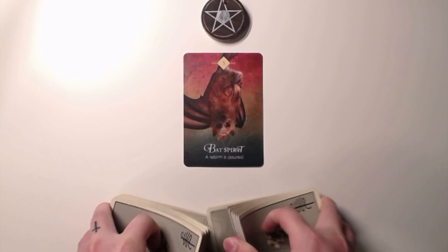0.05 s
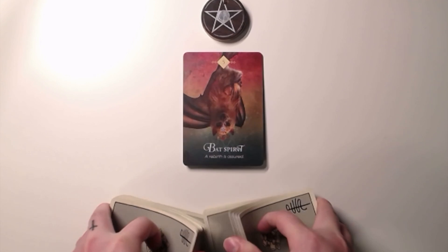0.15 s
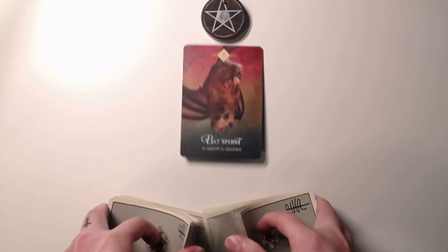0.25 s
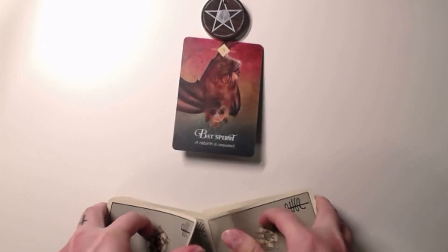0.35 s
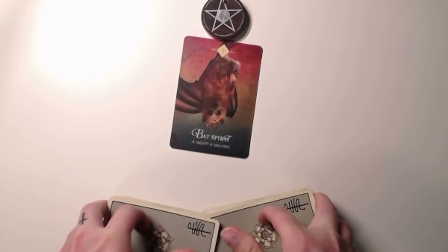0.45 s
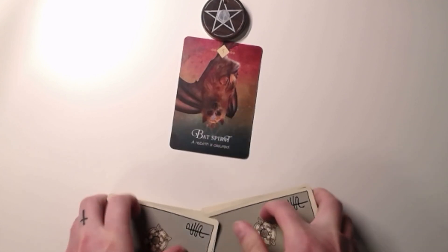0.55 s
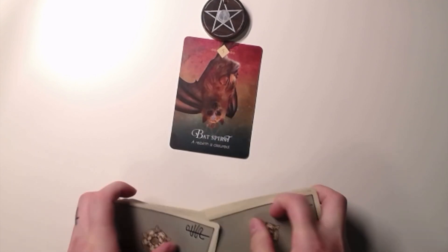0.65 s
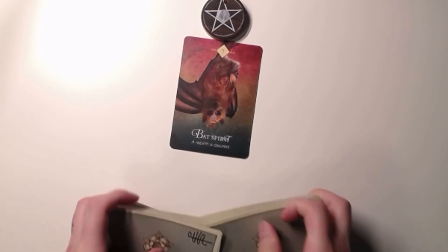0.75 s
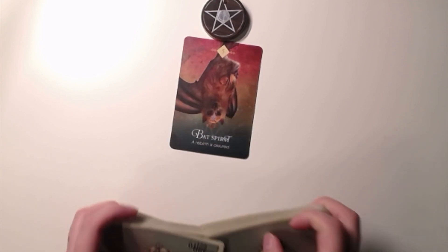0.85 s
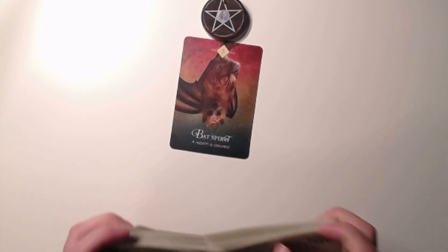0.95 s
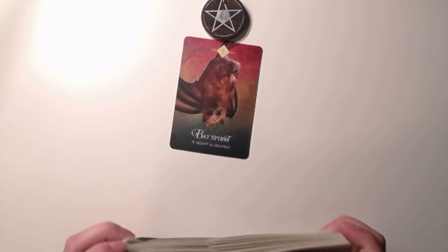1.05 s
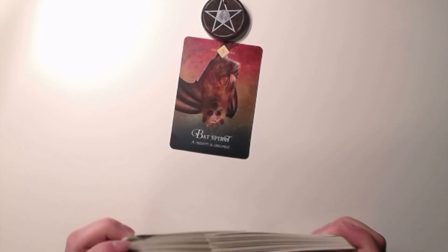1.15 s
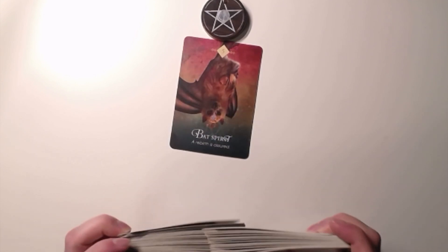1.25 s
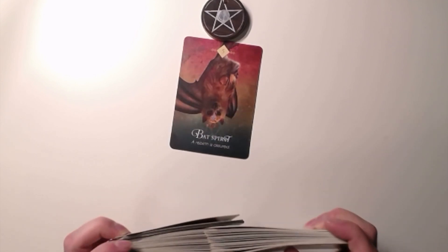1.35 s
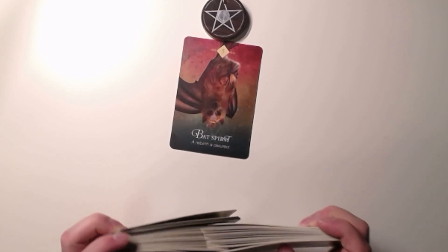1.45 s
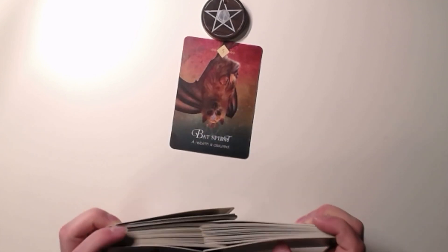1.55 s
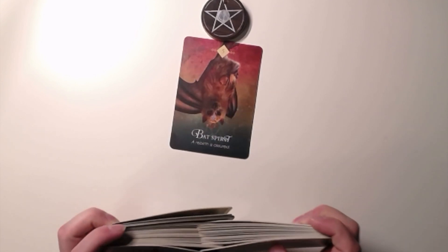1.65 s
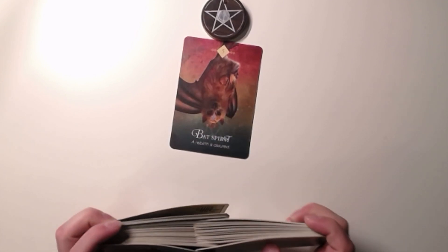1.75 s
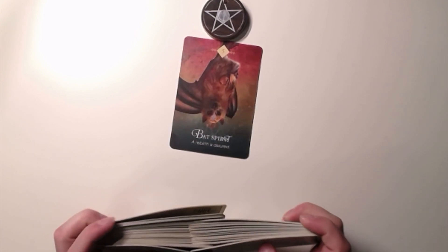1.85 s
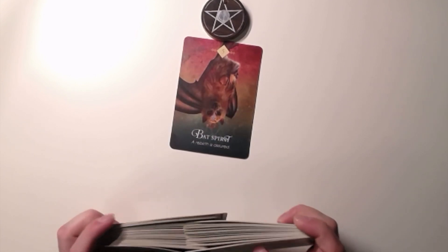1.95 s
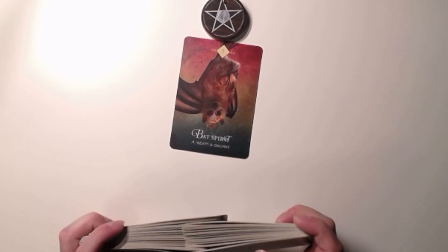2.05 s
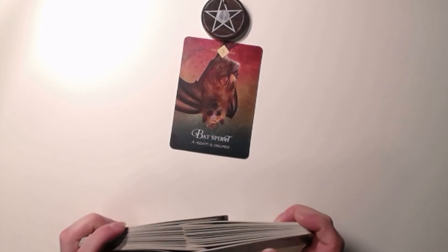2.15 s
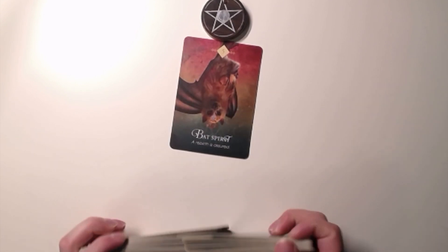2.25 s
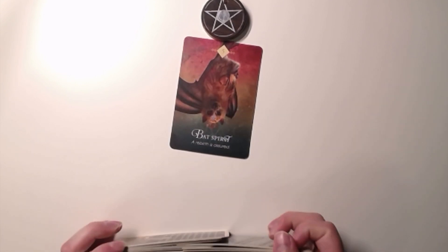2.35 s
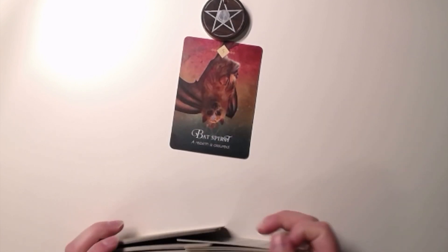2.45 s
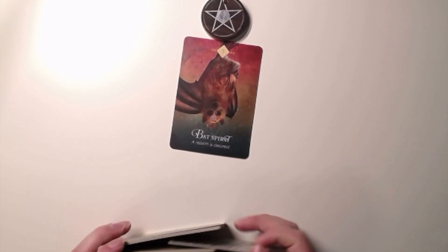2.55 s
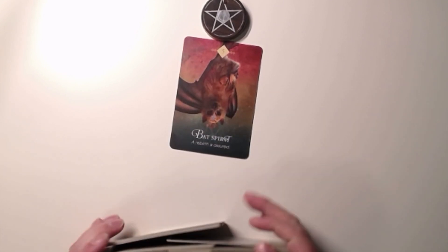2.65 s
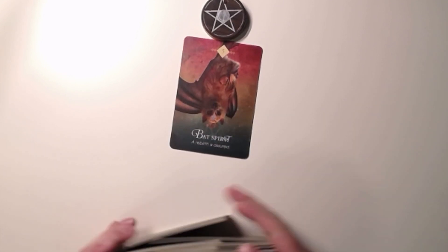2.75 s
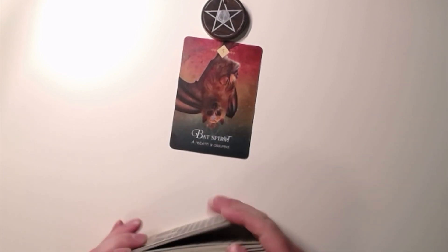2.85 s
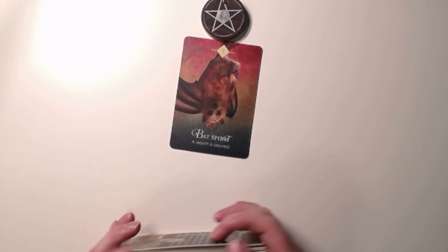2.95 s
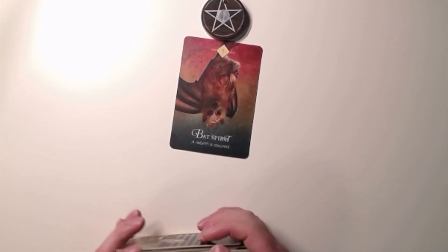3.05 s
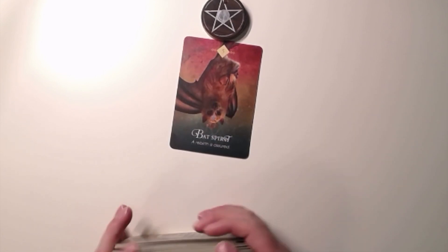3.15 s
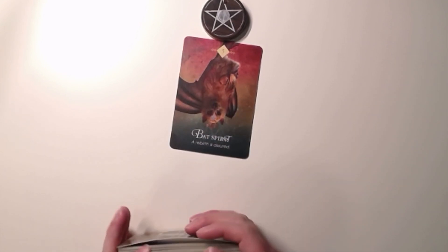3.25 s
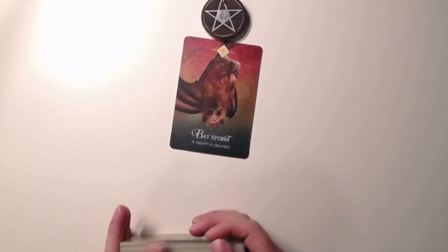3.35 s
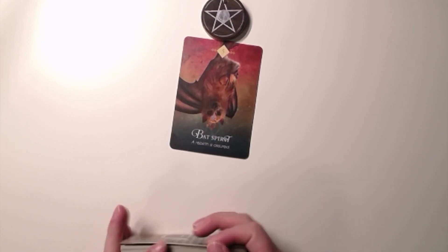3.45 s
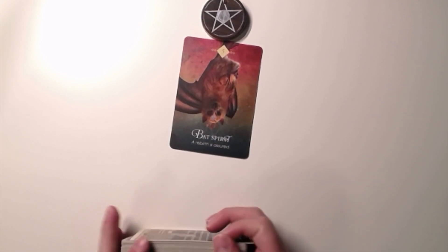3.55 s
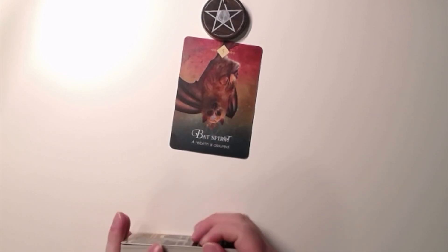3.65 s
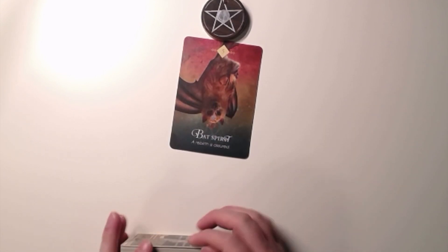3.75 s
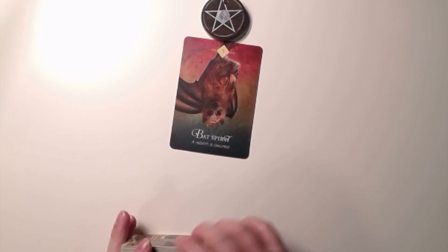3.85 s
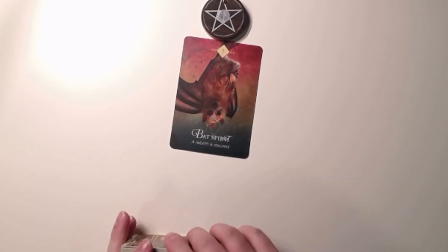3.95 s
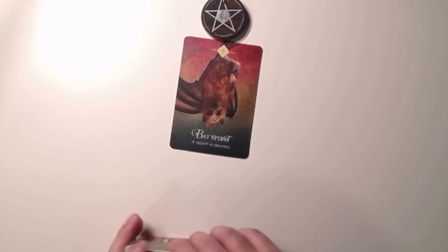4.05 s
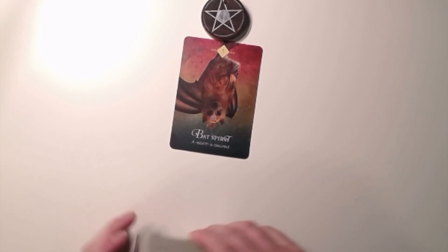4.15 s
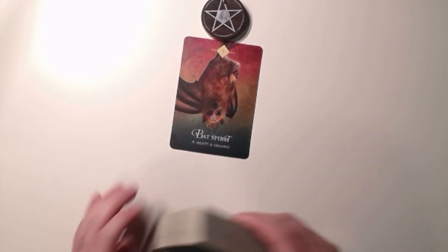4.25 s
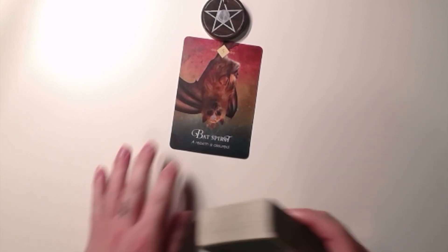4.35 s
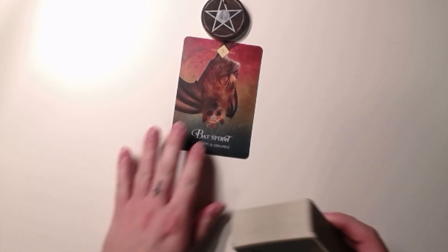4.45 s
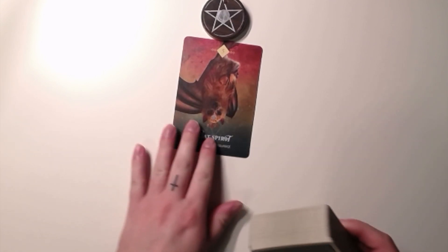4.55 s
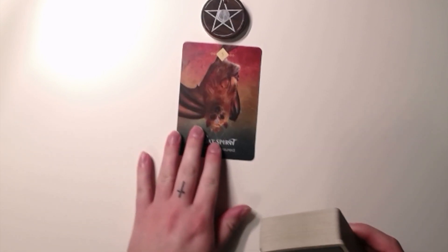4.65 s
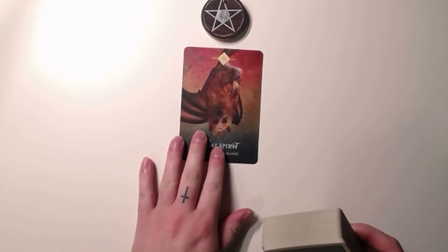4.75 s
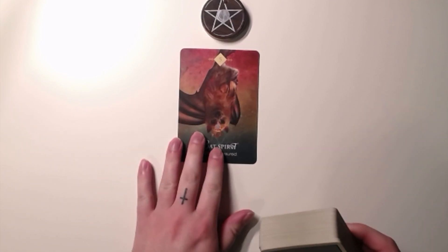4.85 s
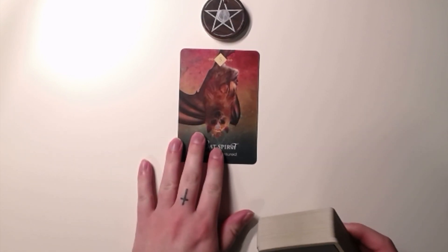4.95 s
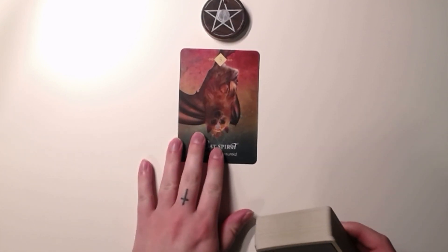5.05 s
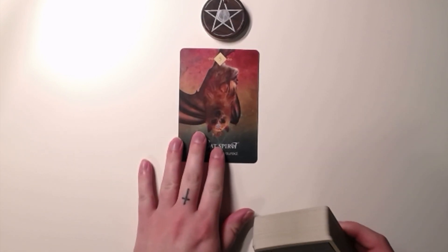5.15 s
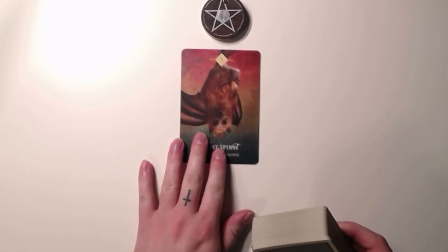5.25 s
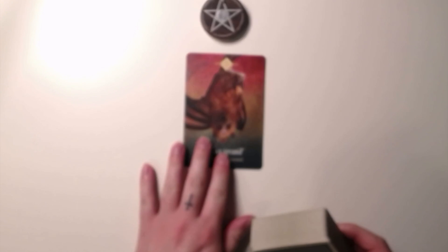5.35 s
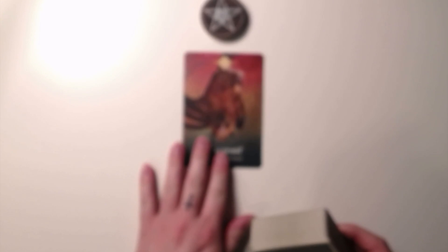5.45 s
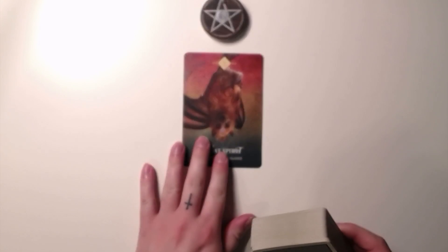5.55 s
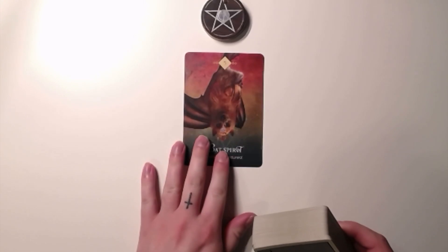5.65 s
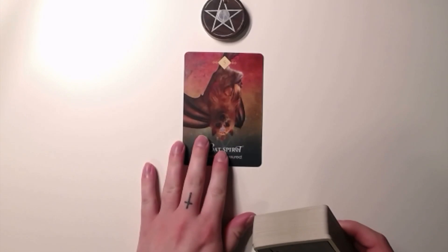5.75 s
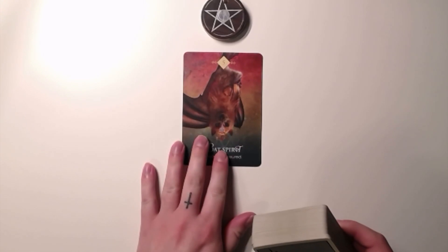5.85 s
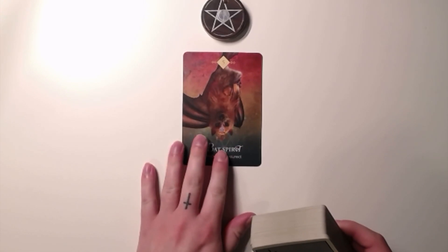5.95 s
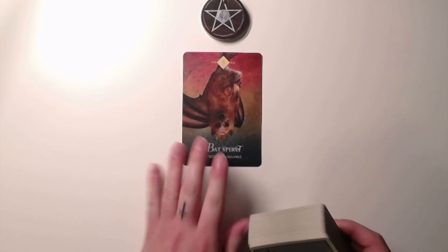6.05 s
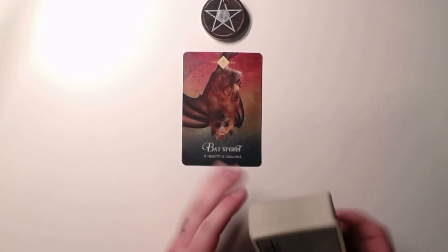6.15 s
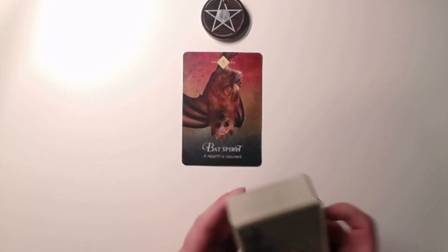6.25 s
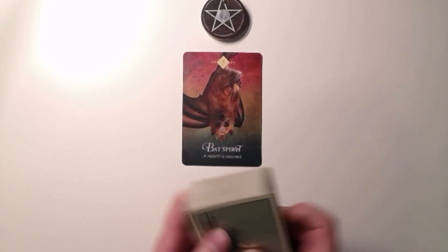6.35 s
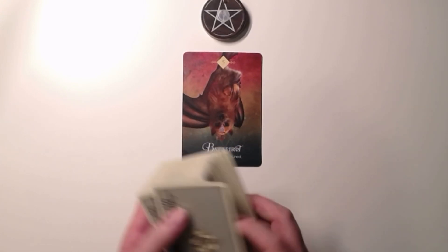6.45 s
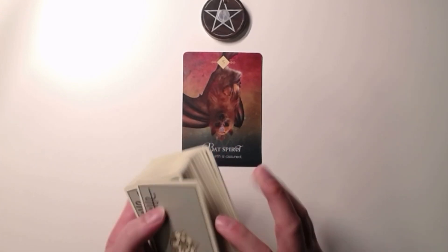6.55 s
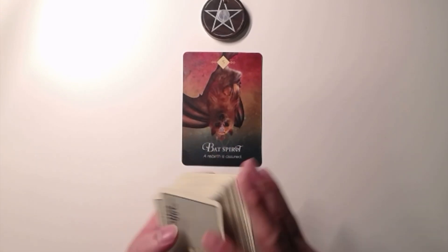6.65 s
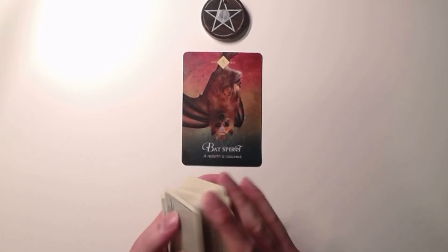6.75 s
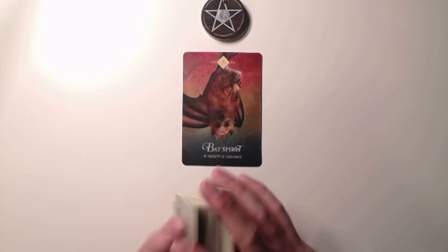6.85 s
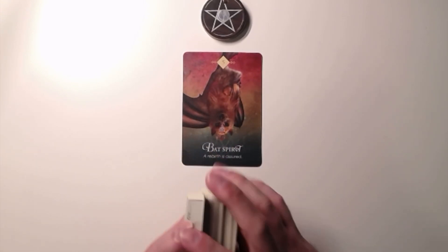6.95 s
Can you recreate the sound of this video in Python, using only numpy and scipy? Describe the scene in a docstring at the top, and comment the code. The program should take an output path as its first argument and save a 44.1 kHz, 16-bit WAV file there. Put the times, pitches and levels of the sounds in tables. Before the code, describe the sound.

A deck of cards is riffle-shuffled on a table, pushed together with crisp snaps, then softly tapped and handled.

```python
"""A thick deck of cards is riffled onto a light table, pushed together, squared by taps and handled.
Card edges slap and snap, ringing the deck; cards and fingers rub by stick-slip, and dragged edges sing.
Blows and the weight of the hands set the table top booming under the microphone.
Near the end, packets of cards drop into a hollow hand. The room is small and quiet."""
import sys
import numpy as np
from scipy import signal
from scipy.fft import rfft, irfft, next_fast_len
from scipy.io import wavfile
from scipy.ndimage import uniform_filter1d

SR = 44100
rng = np.random.default_rng(int(sys.argv[2]) if len(sys.argv) > 2 else 0)


def materialize(psi):
    """Save the field psi as 16-bit PCM at rate SR to the path in sys.argv[1].

    A 1-D psi becomes a single channel; in a 2-D psi each row is a channel.
    """
    bounded = np.clip(np.atleast_2d(psi).T, -1, 1)
    quanta = np.round(bounded * 32767).astype(np.int16)
    wavfile.write(sys.argv[1], SR, quanta)


N = 309387

# Cards falling in the riffle. Each row: start in seconds, then crack, fizz and weight in dB.
RIFFLE_CARDS = [(.0024, -25, -26, -10), (0.0284, -29.5, -27, -22), (.047, -26.5, -33, -32),
                (0.0523, -34, -32, -23.5), (0.0668, -32, -26.5, -24), (0.0904, -35.5, -34.5, -24),
                (0.0982, -30.5, -28.5, -20), (0.1043, -14, -16, -7.5), (0.1352, -23.5, -23, -23),
                (0.1402, -19.5, -20, -10), (0.1562, -21.5, -23.5, -21.5), (.165, -21.5, -16, -14),
                (0.176, -21.5, -21, -11.5), (0.1969, -30, -19, -12), (0.2054, -29, -32, -12.5),
                (0.2141, -27, -27.5, -21.5), (0.2363, -23, -21, -2), (0.2443, -27.5, -22.5, -24),
                (0.2533, -25.5, -24.5, -15.5), (0.2618, -32, -23, -24), (0.2861, -25, -30.5, -7.5),
                (0.3008, -34, -32, -10.5), (0.3098, -25.5, -26, -9), (.315, -28, -24, -24.5),
                (0.3289, -25.5, -19.5, -4), (0.3446, -19, -20.5, -13), (0.351, -24, -15.5, -12),
                (0.3675, -22.5, -15.5, -18), (0.3798, -29, -21, -26)]
# Card or finger sliding on card, opening with the riffle's flutter. Each row: start in seconds,
# length in seconds, rising share of the length, then rub, rasp and hiss in dB.
RUB_STROKES = [(0.0, 0.077, 0.073, -29, -47, -45.5), (0.076, 0.36, 0.64, -37.5, -35.5, -36.5),
               (0.499, 0.13, 0.18, -52.5, -59.5, -65), (0.548, 0.18, 0.34, -61.5, -53.5, -54.5),
               (0.723, 0.15, 0.13, -71.5, -72, -76.5), (0.848, 0.063, 0.46, -80, -74.5, -64),
               (0.956, 0.046, 0.42, -72, -67.5, -62.5), (1.088, 0.077, 0.22, -57, -69, -74),
               (1.131, 0.17, 0.19, -56.5, -60.5, -69), (1.246, 0.17, 0.63, -61.5, -59.5, -60.5),
               (1.399, 0.085, 0.41, -79, -64.5, -63), (1.436, 0.14, 0.39, -73.5, -73, -73),
               (1.645, 0.018, 0.35, -39.5, -49, -69), (1.689, 0.079, 0.33, -51.5, -65, -74),
               (1.816, 0.1, 0.6, -63, -53, -55), (1.904, 0.099, 0.51, -51.5, -60.5, -66),
               (1.964, 0.13, 0.52, -53, -58.5, -64.5), (2.054, 0.54, 0.28, -60.5, -69, -68.5),
               (2.139, 0.033, 0.58, -65, -53, -62.5), (2.203, 0.24, 0.22, -72, -68, -65.5),
               (2.402, 0.053, 0.64, -29.5, -58, -73), (2.45, 0.13, 0.47, -41, -37.5, -48.5),
               (2.562, 0.083, 0.23, -67, -60.5, -78), (2.626, 0.037, 0.65, -42.5, -45.5, -59),
               (2.686, 0.14, 0.37, -39, -38.5, -46), (2.861, 0.069, 0.37, -33, -44.5, -48),
               (2.907, 0.12, 0.61, -38.5, -44.5, -50), (3.024, 0.026, 0.45, -47, -66, -56),
               (3.104, .12, 0.68, -30, -33, -48.5), (3.22, 0.034, 0.52, -52, -76, -100),
               (3.295, 0.13, 0.52, -48, -64.5, -68.5), (3.436, 0.068, 0.73, -50, -52.5, -53),
               (3.5, 0.046, 0.17, -48, -45, -58), (3.564, 0.079, 0.39, -42, -48, -53),
               (3.631, 0.1, 0.51, -62, -70, -67), (3.766, 0.042, 0.59, -51, -55, -67),
               (3.807, 0.18, 0.33, -64.5, -64.5, -66), (3.935, 0.065, 0.36, -60.5, -55.5, -64.5),
               (3.98, 0.09, 0.59, -53.5, -56.5, -71), (4.059, 0.05, 0.38, -62.5, -86, -85),
               (4.526, .11, 0.49, -67, -61, -60), (4.588, 0.15, 0.44, -79, -65, -61),
               (4.779, 0.06, 0.53, -72, -73.5, -78), (5.221, .092, 0.43, -78, -68, -62),
               (5.376, 0.044, 0.49, -78, -73, -73), (5.909, 0.042, 0.56, -83, -82.5, -74.5),
               (6.098, 1, 0.41, -80.5, -84, -71), (6.132, 0.044, 0.42, -83.5, -74.5, -65),
               (6.237, 0.051, 0.64, -78, -80, -70.5), (6.33, 0.083, 0.39, -67, -66, -55.5),
               (6.388, 0.098, 0.24, -68, -73, -60.5), (6.508, 0.046, .4, -70, -73, -63.5),
               (6.611, 0.054, .48, -65, -77, -63), (6.72, .064, 0.29, -74.5, -75.5, -76),
               (6.799, 0.099, 0.52, -75, -71, -59), (6.914, 0.1, 0.27, -74.5, -73, -61)]
# Hands on the table, in three spans: riffle, squaring, handling.
# Each row: time in seconds, sway in dB, boom in dB.
HAND_LOAD_SPANS = [
    [(0.0, -28, -34), (0.19, -18, -24), (0.37, -16, -28), (.53, -42, -55), (.57, -29.5, -45),
     (0.778, -49, -71), (1.06, -75, -79)],
    [(1.15, -49.5, -46.5), (1.38, -69, -68.5), (1.47, -42.5, -49), (1.62, -33.5, -52.5), (1.77, -37, -56),
     (1.87, -54, -60), (1.92, -34.5, -42.5), (2.08, -37.5, -49), (2.3, -46, -47), (2.6, -44, -43.5),
     (3.07, -47.5, -41), (3.12, -34, -28), (3.35, -43, -47), (3.53, -45.5, -54), (3.57, -36, -56),
     (3.65, -35.5, -44.5), (3.68, -56, -61.5), (3.75, -60, -60), (3.775, -34, -52), (3.85, -47, -55),
     (3.89, -39, -58.5), (3.94, -51.5, -61), (3.98, -38, -53.5), (4.3, -75, -80.5)],
    [(4.51, -75, -80.5), (4.55, -38, -68), (4.66, -53, -80.5), (4.75, -72, -79), (5.44, -65, -80.5),
     (5.88, -76, -82.5), (5.96, -59.5, -76), (6.2, -71.5, -85), (7.02, -68, -77)],
]
# Deck touching table and hands. Each row: start in seconds, then edge, knock and table thud in dB.
DECK_TAPS = [(0.511, -63, -41.5, -62), (0.53, -60, -74, -65), (0.5434, -53, -68, -29.5),
             (.631, -34, -70, -39), (0.9029, -66.5, -82, -77), (0.934, -66, -84, -77),
             (1.096, -55.5, -47.5, -42.5), (1.243, -54.5, -68, -70), (1.328, -49.5, -66, -62),
             (1.439, -61, -53.5, -44.5), (1.466, -75, -50, -33.5), (1.536, -67.5, -53, -53),
             (1.564, -80.5, -59, -36.5), (1.5953, -72, -41.5, -28.5), (1.6495, -59, -37.5, -37),
             (1.7052, -58.5, -36, -22), (1.7217, -61.5, -45, -24.5), (1.8855, -46.5, -49, -30.5),
             (1.9248, -61, -50, -31), (1.997, -57.5, -31.5, -29.5), (2.036, -56.5, -28.5, -28.5),
             (2.0578, -60, -35, -31.5), (2.23, -66, -50, -36), (2.265, -66, -45, -32.5),
             (3.787, -53, -45.5, -40.5), (3.855, -59, -77, -67), (3.955, -66, -44.5, -39.5),
             (3.977, -45.5, -42.5, -49), (4.0131, -57, -43, -36.5), (4.523, -57, -65, -56),
             (4.5411, -63.5, -49.5, -48), (5.922, -75.5, -71.5, -72.5), (5.934, -70, -76.5, -66),
             (5.997, -69, -62.5, -70), (6.129, -65.5, -81, -77.5), (6.34, -65, -58.5, -69.5),
             (6.367, -74.5, -55.5, -59), (6.391, -57.5, -52.5, -58), (6.408, -66, -60.5, -70.5),
             (6.427, -74, -60, -69), (6.4948, -63.5, -74, -76), (6.5051, -62, -74, -60),
             (6.523, -62, -60, -59), (6.54, -63.5, -63.5, -71.5), (6.629, -71, -59, -76),
             (6.7161, -59, -56.5, -58.5), (6.7286, -50.5, -52, -57), (6.849, -58.5, -71, -74),
             (6.9267, -61, -65.5, -76.5), (6.936, -60, -67.5, -73)]
# Edge dragged along edge. Each row: start in seconds, length in seconds, level in dB, pitch in Hz.
EDGE_SCRAPES = [(.793, 0.039, -69, 1804), (0.792, 0.038, -72, 3570), (1.068, 0.027, -73.5, 1800),
                (1.069, 0.029, -74.5, 3600), (1.101, 0.15, -61.5, 1620), (1.136, 0.13, -66, 5800),
                (1.194, 0.063, -59.5, 3620), (1.255, 0.155, -62.5, 4240), (1.278, .11, -79, 1810),
                (4.201, .04, -74, 1803)]
# Edges snapping into place. Each row: start in seconds, then crack, snap and knock in dB.
EDGE_SNAPS = [(2.362, -66, -28.5, -32.5), (2.39, -42, -14, -23.5), (2.413, -43, -25, -36),
              (2.421, -42, -15, -61), (2.4271, -49, -26, -22), (2.4365, -17, -16, -19.5),
              (2.4856, -44, -22.5, -26.5), (2.498, -21, -21, -28.5), (2.508, -37, -31, -36),
              (2.516, -27, -24, -35), (2.6222, -32, -30, -35), (2.6635, -65, -20, -24.5),
              (2.7804, -24, -9, -21), (2.8569, -63, -29, -33), (2.8931, -39, -15.5, -37),
              (2.9041, -54, -19, -28), (2.9131, -36, -17, -30), (2.9453, -34, -25.5, -32),
              (3.0665, -39.5, -21, -30), (3.074, -60, -31.5, -25), (3.0887, -39, -19.5, -38.5),
              (3.0979, -28.5, -17.5, -30), (3.1035, -22.5, -10, -19), (3.1083, -27.5, -9.5, -22.5),
              (3.1158, -20, -10.5, -17.5), (3.119, -11.5, -10, -24), (3.1211, -4, -11, -11.5),
              (3.1249, -3.5, -5.5, -17), (3.1307, -12, -18, -23.5), (3.1844, -17.5, -16, -24),
              (3.2064, -55, -16, -20.5), (3.252, -60, -26, -30), (3.268, -60, -19.5, -36),
              (3.281, -67, -24, -51), (3.291, -60, -40, -56), (3.305, -44, -26.5, -35.5),
              (3.44, -75, -45, -38), (3.5069, -21.5, -16, -31), (3.559, -56, -28.5, -40.5),
              (3.5845, -53, -24.5, -34), (3.6168, -54, -29, -40), (3.682, -59, -36.5, -59),
              (3.704, -51, -26, -43), (3.7131, -64, -33, -59), (3.752, -64, -36.5, -59)]
# Packets dropping into the hand. Each row: start in seconds, peak in dB, pitch in Hz.
PALM_PATS = [(6.131, -52.5, 605), (6.345, -54, 594), (6.37, -49.5, 652), (6.41, -60, 568),
             (6.432, -60, 599), (6.505, -53, 598), (6.525, -43.5, 127.3), (6.63, -50.5, 570),
             (6.646, -53, 495), (6.731, -37.5, 435), (6.733, -64, 723), (6.755, -55, 448)]

# Modes of the deck and of the table top (low sway, higher boom).
# Each row: frequency in Hz, relative gain in dB, T60 in seconds.
CARD_DECK_MODES = [(1022, -6, 0.036), (1545, 6, 0.013), (1958, 4, 0.01), (2496, 2, 0.011),
                   (2915, 2.5, 0.0087), (3260, 3.5, 0.0083), (3960, 6.5, 0.0035), (4705, 3.5, 0.0039)]
TABLE_SWAY_MODES = [(33.2, -18, 0.36), (46.7, -8.5, .2), (62.8, 1.5, 0.18), (89, 0, 0.073)]
TABLE_BOOM_MODES = [(121.04, 0, 0.1), (143.4, -2.5, 0.19), (187.5, -4.5, 0.27), (229.2, -3.5, 0.16),
                    (274, 0.5, 0.14), (352.5, -4.5, 0.13), (482.5, -9, 0.19)]
# Spectra of card rub, card hiss, and room and microphone noise.
# Each row: frequency in Hz, relative density in dB.
RUB_SPECTRUM = [(210, -31), (350, -7), (578, 4), (1190, -6), (1310, -8.5), (1500, -3.5), (1650, -6),
                (2030, -10.5), (2540, -11), (2940, -9.5), (3610, -14), (4790, -16.5), (6500, -24.5),
                (8450, -49.5), (14300, -120)]
HISS_SPECTRUM = [(2500, -23.5), (4000, -4.5), (6300, -9.5), (7600, -6), (10000, 1), (11500, -9.5),
                 (13700, -9.5), (15800, -16), (16400, -24.5)]
FLOOR_SPECTRUM = [(12, -42), (20, -4.5), (32, -21.5), (86, -2), (173, -17.5), (426, -25), (463, -37),
                  (548, -24.5), (667, -25), (1020, -26.5), (1140, -32), (1780, -29.5), (2230, -33),
                  (6000, -41.5), (10000, -35.5), (15000, -41), (16300, -47)]


def from_db(db):
    """Decibels to amplitude."""
    return 10 ** (np.asarray(db) / 20)


def unit_rms(x):
    """Scale to rms 1."""
    return x / np.sqrt(np.mean(x ** 2) + 1e-20)


def unit_onset(x):
    """Scale to rms 1 over the first 2 ms."""
    return x / np.sqrt(np.mean(x[:SR // 500] ** 2))


def unit_peak(x):
    """Scale to peak 1."""
    return x / np.abs(x).max()


def band(x, low_hz, high_hz):
    """Band-pass with a steep top, scaled to peak 1."""
    x = signal.sosfilt(signal.butter(2, low_hz, "high", fs=SR, output="sos"), x)
    return unit_peak(signal.sosfilt(signal.butter(4, high_hz, fs=SR, output="sos"), x))


def colour(x, spectrum):
    """Filter by a spectrum, -120 dB outside it."""
    hz, db = np.transpose(spectrum)
    bins_hz = np.arange(len(x) // 2 + 1) * SR / len(x) + 1e-3
    gain = from_db(np.interp(np.log(bins_hz), np.log(hz), db, -120, -120))
    return irfft(rfft(x) * gain, len(x))


def ring(force, hz, t60_s):
    """One mode: a unit impulse starts a decaying sine of height 1."""
    r, w = from_db(-60 / (t60_s * SR)), 2 * np.pi * hz / SR
    return signal.lfilter([0, np.sin(w)], [1, -2 * r * np.cos(w), r * r], force + 1e-18)


def body(force, modes, spread_db=0):
    """Modes under one force, with alternating signs and randomly spread gains."""
    offsets_db = rng.normal(0, spread_db, len(modes))
    return sum((-1) ** k * from_db(db + offsets_db[k]) * ring(force, hz, t60_s)
               for k, (hz, db, t60_s) in enumerate(modes))


def grit(ticks_per_s, spread_db, smooth):
    """Stick-slip: uneven random ticks over a share of smooth noise."""
    sizes = from_db(spread_db * np.minimum(rng.exponential(1, N), 5)) * rng.choice([-1, 1], N)
    ticks = unit_rms(sizes * (rng.random(N) < ticks_per_s / SR))
    return unit_rms(ticks + smooth * rng.standard_normal(N))


def drift(corner_hz):
    """Low-passed random wander of spread 1."""
    hop, settle = 20, 2000
    r = np.exp(-2 * np.pi * corner_hz * hop / SR)
    noise = rng.standard_normal(N // hop + settle + 2)
    slow = signal.lfilter([1], [1, -2 * r, r * r], noise)[settle:]
    return np.interp(np.arange(N) / hop, np.arange(len(slow)), unit_rms(slow - slow.mean()))


def smear(gain, span_s):
    """Spread an envelope's power both ways in time."""
    width = round(span_s * SR)
    return np.sqrt(np.abs(uniform_filter1d(uniform_filter1d(gain ** 2, width), width)))


def blows(rows, tick, modes_db, t60_s, snap_hz, knock_hz, crack_hz,
          knock_t60_ratio=1, fizz_t60_ratio=1):
    """A tick and dying noise drive the deck; edges fizz, the table thuds. Returns air and table."""
    size = 6000
    rebound_s, rebound_share, shove_s = 0.002183, 0.22, 0.0022
    t = np.arange(size) / SR
    decay_db = -60 * t / t60_s
    shove = np.sin(np.pi * np.minimum(t / shove_s, 1))
    fade = np.cos(np.pi / 2 * t / t[-1])
    air, table = np.zeros((2, N + size))
    for start_s, snap_db, crack_db, knock_db, fizz_db, thud_db in rows:
        edge_noise, knock_noise, fizz_noise = rng.standard_normal((3, size))
        force = edge_noise * from_db(decay_db)
        force[0] += tick
        force[round(rebound_s * SR)] += rebound_share * tick  # the edge springs back and touches again
        deck = force + from_db(modes_db) * body(force, CARD_DECK_MODES, spread_db=4)
        snap = from_db(snap_db) * band(deck, *snap_hz)
        crack = from_db(crack_db) * unit_onset(band(deck, *crack_hz))

        push = knock_noise * from_db(decay_db / knock_t60_ratio)
        push[0] += tick
        hollow = 0.032 * ring(push, hz=740, t60_s=0.0088)  # air between the cards
        knock = from_db(knock_db) * unit_onset(band(push + hollow, *knock_hz))
        hiss = colour(fizz_noise, HISS_SPECTRUM) * from_db(decay_db / fizz_t60_ratio)
        fizz = from_db(fizz_db) * unit_onset(hiss)

        jump = band(shove, 99, 800)  # the table top jumps once, then rings
        boom = unit_peak(body(shove, TABLE_BOOM_MODES, spread_db=5))
        at = round(start_s * SR)
        air[at:at + size] += snap - crack + knock + fizz
        table[at:at + size] += from_db(thud_db) * unit_peak(jump + boom) * fade
    return air[:N], table[:N]


def riffle():
    """Each falling card's edge snaps, cracks and fizzes; its weight knocks and thuds."""
    rows = [(start_s, crack_db + 1, crack_db, weight_db - 7.5, fizz_db, weight_db)
            for start_s, crack_db, fizz_db, weight_db in RIFFLE_CARDS]
    return blows(rows, tick=8.3, modes_db=-10, t60_s=0.02, knock_t60_ratio=1.4, fizz_t60_ratio=0.99,
                 snap_hz=(750, 2400), knock_hz=(300, 900), crack_hz=(2900, 6500))


def stroke_gains():
    """Rub, rasp and hiss envelopes: each stroke swells and fades, powers add."""
    t, power = np.arange(N) / SR, np.zeros((3, N))
    for start_s, length_s, rise_share, *levels_db in RUB_STROKES:
        peak_s, end_s = start_s + rise_share * length_s, start_s + length_s
        span = slice(round(start_s * SR), round(end_s * SR))
        swell = np.interp(t[span], [start_s, peak_s, end_s], [0, 1, 0])
        power[:, span] += np.outer(from_db(levels_db), swell) ** 2
    return np.sqrt(power)


def rubbing():
    """Cards and fingers stick and slip; a faint rustle and whisper hang around the strokes."""
    rub_gain, rasp_gain, hiss_gain = stroke_gains()
    rustle_gain = from_db(-10) * smear(rub_gain, span_s=0.12)
    whisper_gain = from_db(-12.5) * smear(hiss_gain, span_s=0.19)
    slip = drift(corner_hz=47)  # shakes rub and hiss together
    rub = from_db(2.5 * slip) * colour(grit(ticks_per_s=3300, spread_db=3.5, smooth=0.93), RUB_SPECTRUM)
    hiss = from_db(0.57 * slip) * colour(grit(ticks_per_s=270, spread_db=1.5, smooth=3), HISS_SPECTRUM)
    low = signal.sosfiltfilt(signal.butter(3, 1250, fs=SR, output="sos"), rub)
    return (rub_gain * unit_rms(low) + rasp_gain * unit_rms(rub - low) + rustle_gain * unit_rms(rub)
            + np.hypot(hiss_gain, whisper_gain) * unit_rms(hiss))


def hand_weight():
    """The uneven weight of the hands makes the table top sway and boom."""
    t = np.arange(N) / SR
    times_s, sway_db, boom_db = np.vstack(HAND_LOAD_SPANS).T
    sway = unit_rms(body(rng.standard_normal(N), TABLE_SWAY_MODES))
    boom = unit_rms(body(grit(ticks_per_s=300, spread_db=2.5, smooth=0.8), TABLE_BOOM_MODES))
    return from_db(np.interp(t, times_s, sway_db)) * sway + from_db(np.interp(t, times_s, boom_db)) * boom


def taps():
    """Soft blows of the deck on table and hands, with as much fizz as crack."""
    rows = [(start_s, (edge_db + knock_db) / 2 - 1, edge_db, knock_db, edge_db, thud_db)
            for start_s, edge_db, knock_db, thud_db in DECK_TAPS]
    return blows(rows, tick=11.3, modes_db=-28, t60_s=0.025,
                 snap_hz=(1300, 2200), knock_hz=(270, 950), crack_hz=(2600, 6500))


def scrapes(t60_cycles=18):
    """Grit rings one narrow resonance of a card while its edge is dragged."""
    t, out = np.arange(N) / SR, np.zeros(N)
    friction = grit(ticks_per_s=4000, spread_db=2.5, smooth=1.5)
    for start_s, length_s, level_db, hz in EDGE_SCRAPES:
        end_s = start_s + length_s
        gate = np.interp(t, [start_s, start_s + 0.011, end_s - 0.012, end_s], [0, 1, 1, 0])
        out += from_db(level_db) * gate * unit_rms(ring(friction, hz, t60_cycles / hz))
    return out


def snaps():
    """Edges snap into place, hard and dry, as the halves are pushed together."""
    rows = []
    for start_s, crack_db, snap_db, knock_db in EDGE_SNAPS:
        fizz_db = 1.2 * crack_db - 15.5  # grows faster than the crack
        thud_db = 0.36 * knock_db - 21.5  # the table takes a share of the knock
        rows.append((start_s, snap_db, crack_db, knock_db, fizz_db, thud_db))
    return blows(rows, tick=13, modes_db=-12, t60_s=0.016, knock_t60_ratio=1.7, fizz_t60_ratio=0.74,
                 snap_hz=(900, 2250), knock_hz=(300, 1150), crack_hz=(2800, 5600))


def pats(push_cycles=0.29):
    """A dropping packet's soft push of air rings the hollow of the hand."""
    t, out = np.arange(N // 20) / SR, np.zeros(N)
    for start_s, peak_db, hz in PALM_PATS:
        push = np.sin(np.pi * np.minimum(t * hz / push_cycles, 1))
        hollow = unit_peak(ring(push, hz, t60_s=0.022))
        at = round(start_s * SR)
        out[at:at + len(t)] += from_db(peak_db) * hollow[:N - at]
    return out


def room(x, t60_s=0.12, wall_cut_hz=26000):
    """Wall reflections: eight feedback delays, duller on every round."""
    size = next_fast_len(N + SR)
    hz = np.arange(size // 2 + 1) * SR / size
    wall = 1 / (1 + 1j * hz / wall_cut_hz)
    loops = [from_db(-60 * lag_s / t60_s) * wall * np.exp(-2j * np.pi * hz * lag_s)
             for lag_s in (.0071, .0097, .0127, .0163, .0191, .0233, .0277, .0311)]
    response = sum((-1) ** k * loop / (1 - loop) for k, loop in enumerate(loops))
    return irfft(rfft(x, size) * response, size)[:N]


def scene():
    """Mono mix of airborne sound, its reflections, the table top and the noise floor."""
    air, table = np.sum([riffle(), snaps(), taps()], axis=0)
    air += rubbing()
    table += hand_weight()
    air += scrapes() + pats()
    floor = from_db(-68.5) * unit_rms(colour(rng.standard_normal(N), FLOOR_SPECTRUM))
    return (air + from_db(-17.5) * room(air) + table + floor)[None]


def record(dry):
    """Soft clip, then a steep low-pass."""
    ceiling, stop_hz = 0.95, 16500
    rounded = ceiling * np.tanh(dry / ceiling)
    return signal.sosfilt(signal.cheby2(14, 50, stop_hz, fs=SR, output="sos"), rounded)


dry = scene()
out = record(dry)
materialize(out)
```